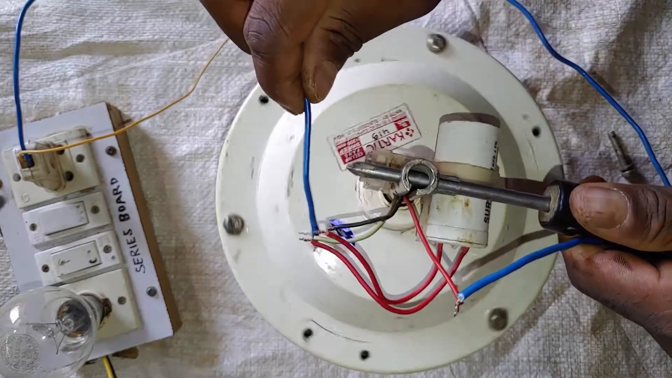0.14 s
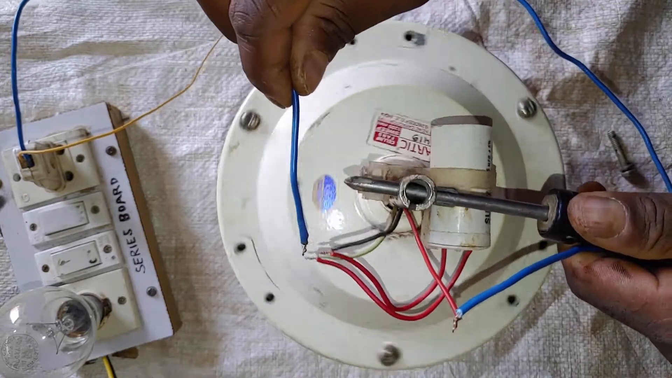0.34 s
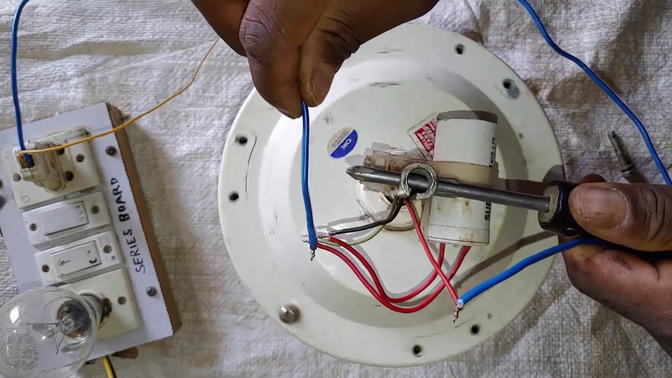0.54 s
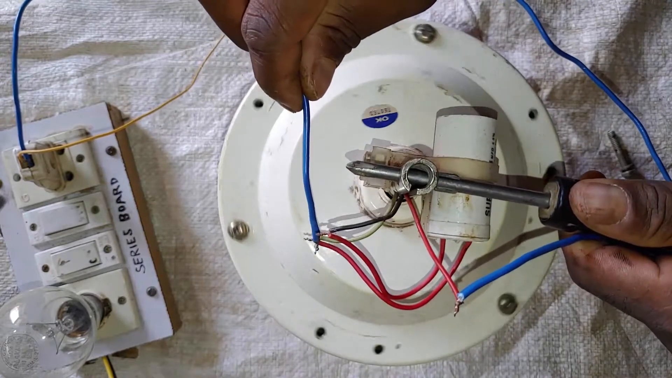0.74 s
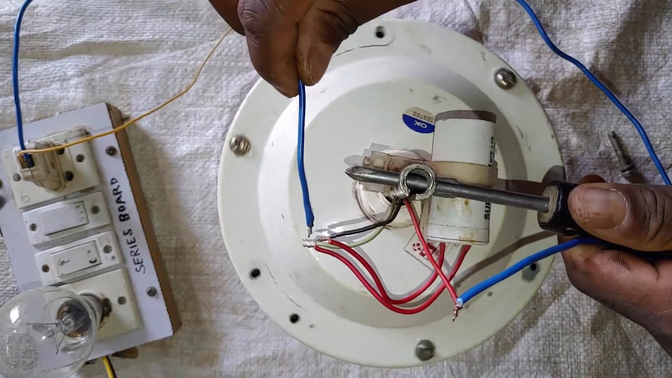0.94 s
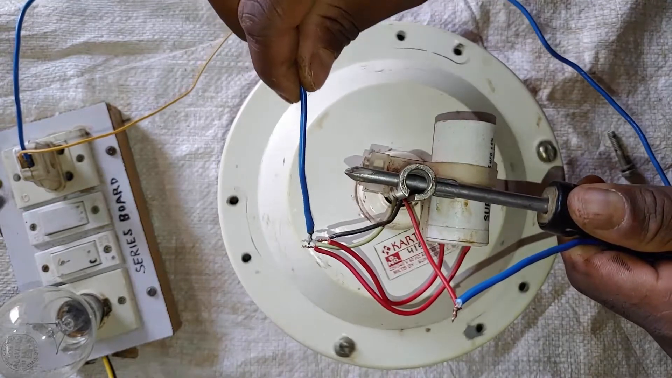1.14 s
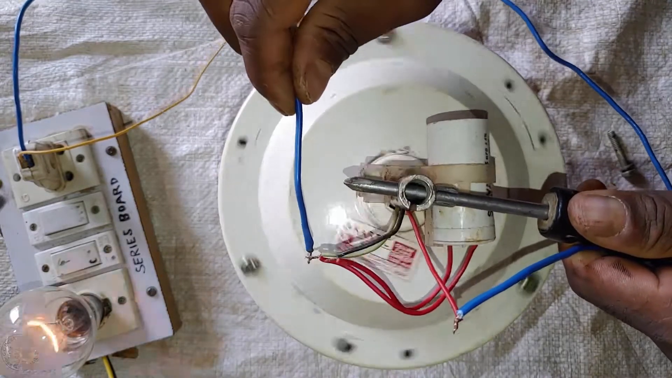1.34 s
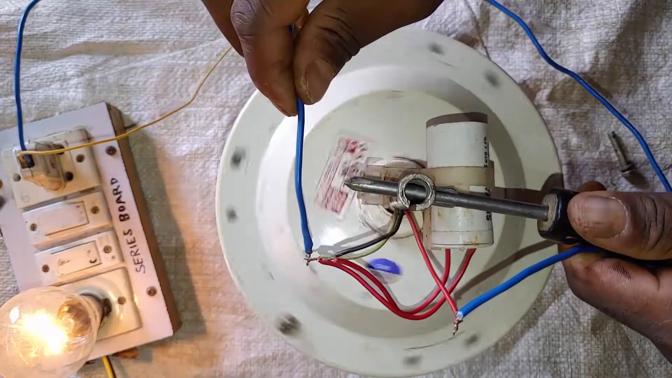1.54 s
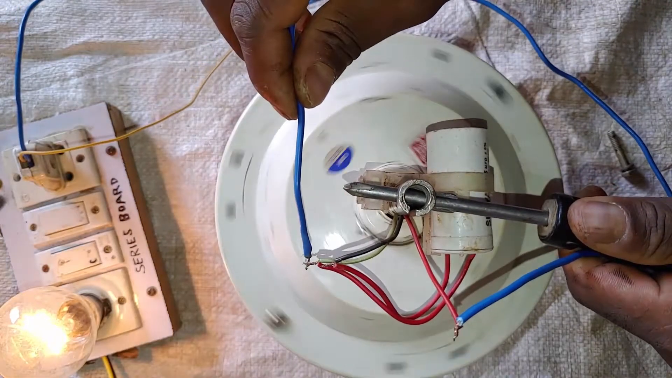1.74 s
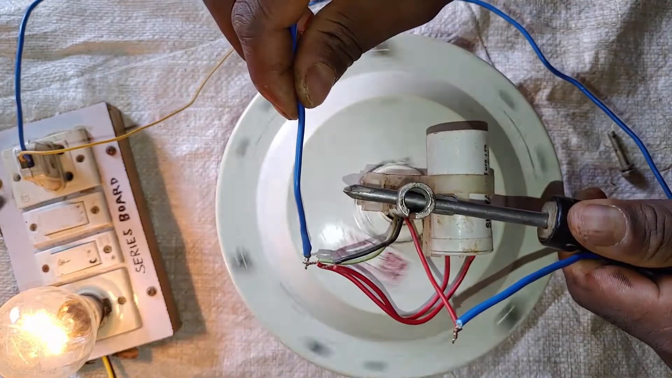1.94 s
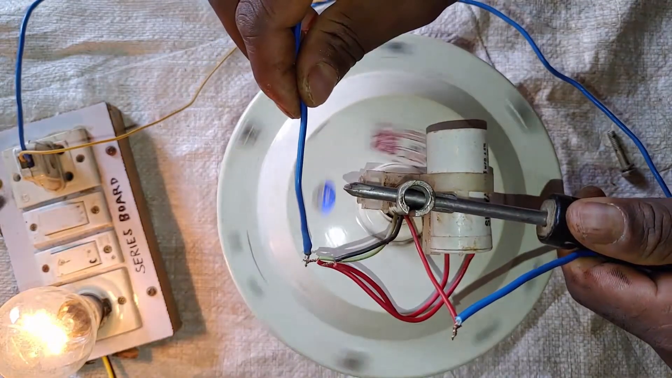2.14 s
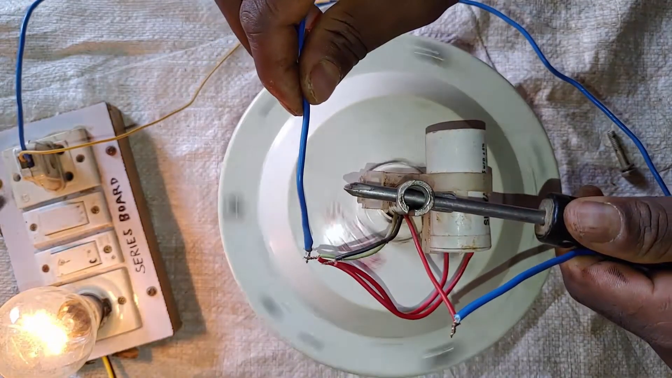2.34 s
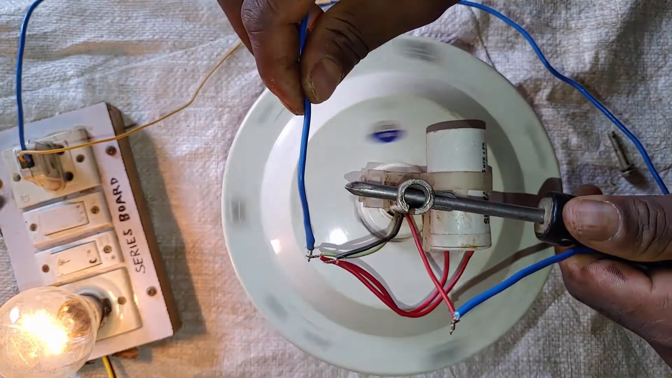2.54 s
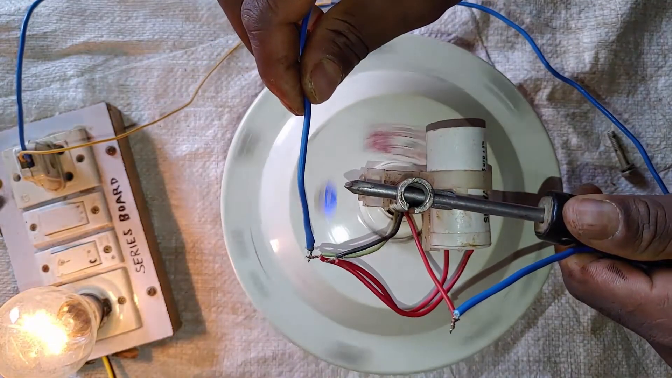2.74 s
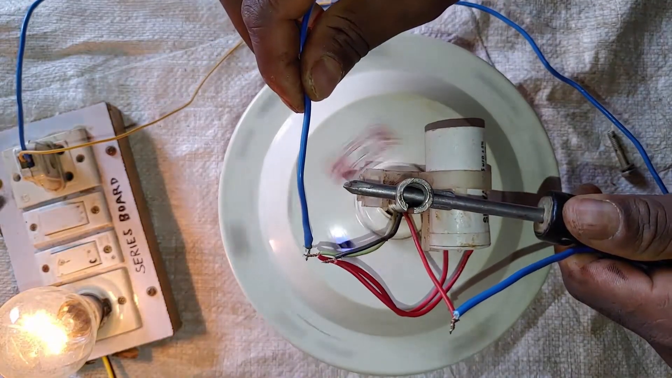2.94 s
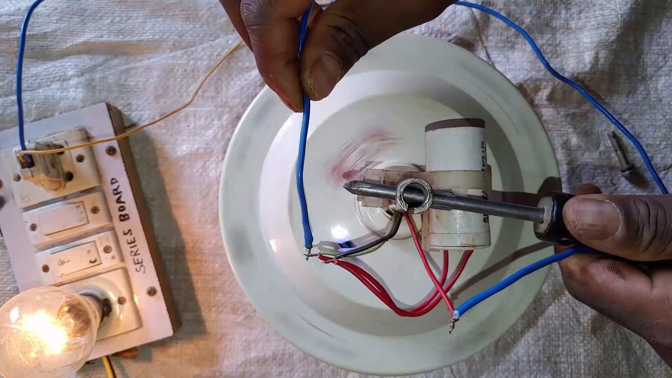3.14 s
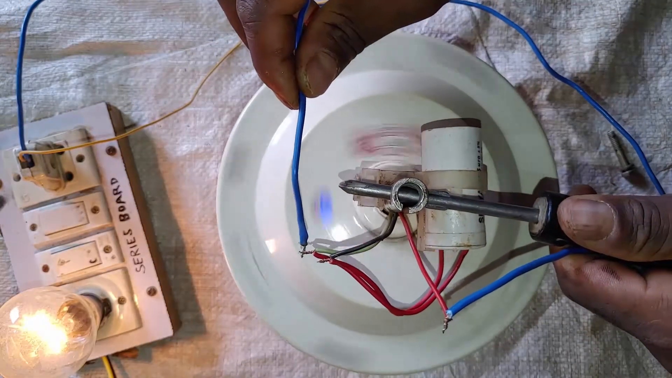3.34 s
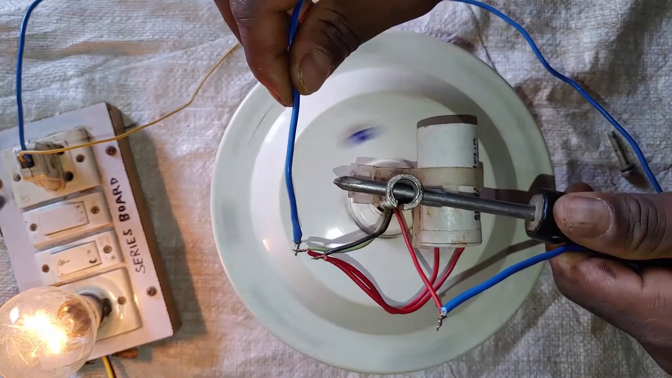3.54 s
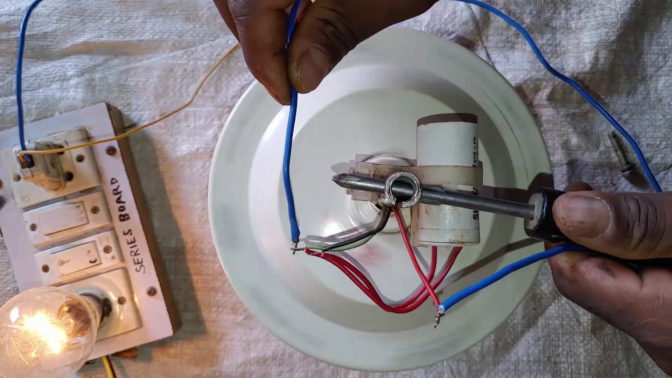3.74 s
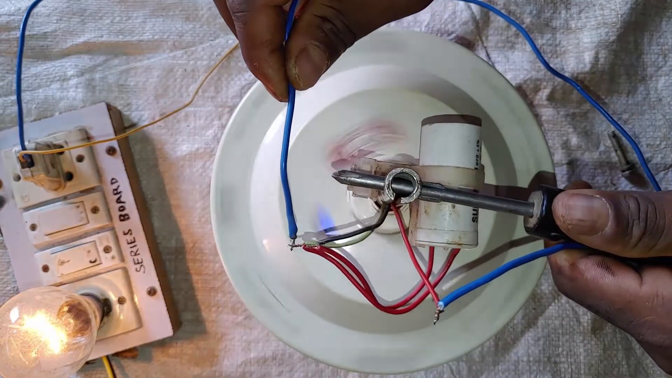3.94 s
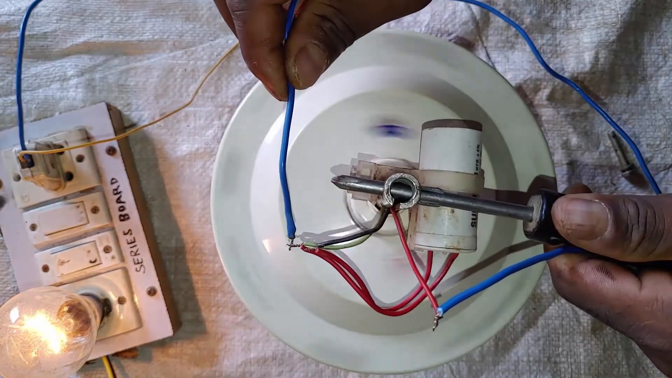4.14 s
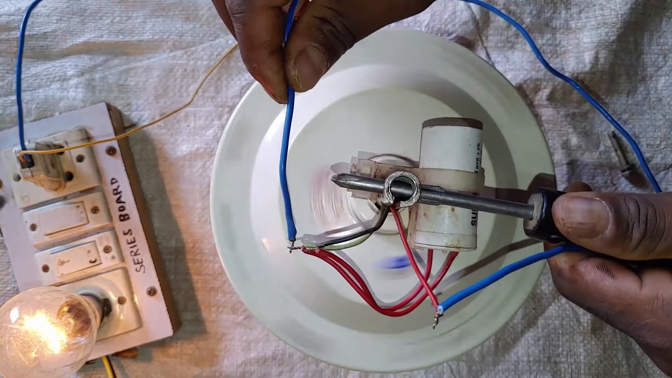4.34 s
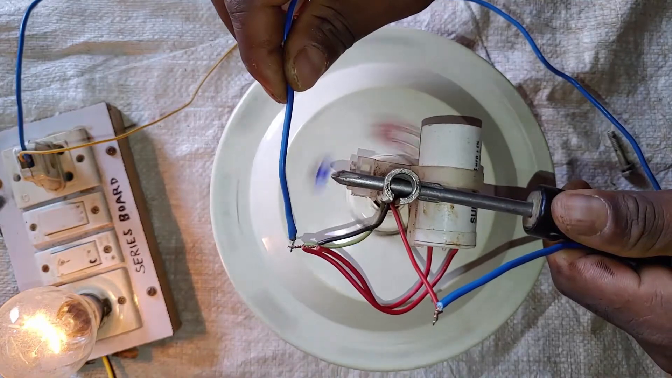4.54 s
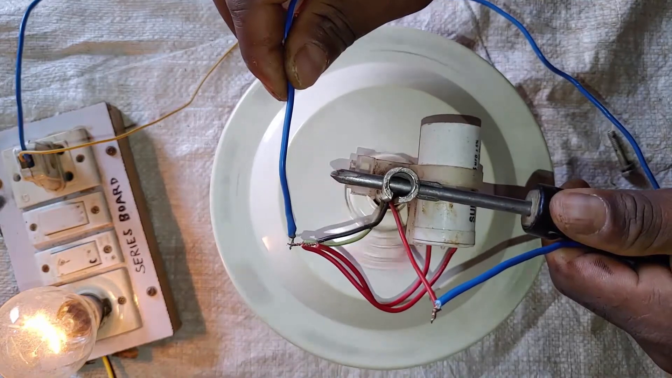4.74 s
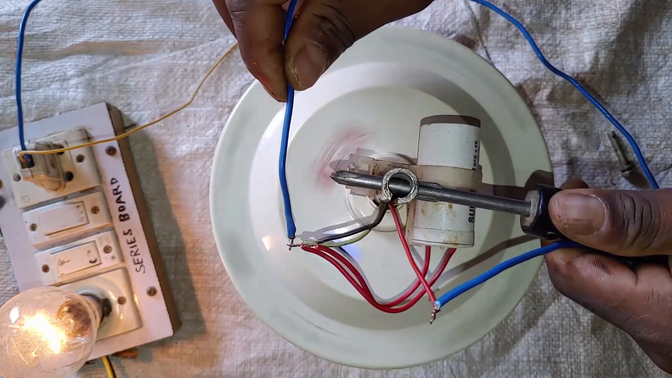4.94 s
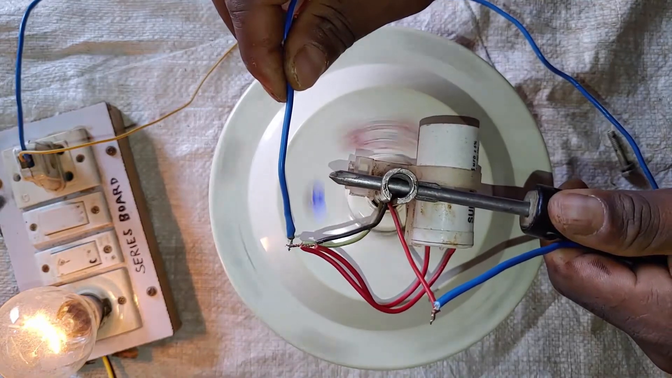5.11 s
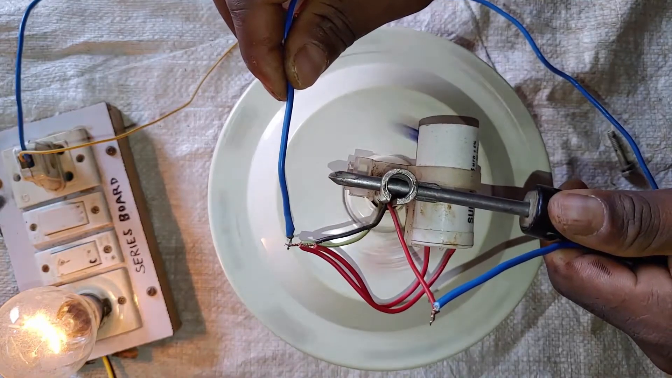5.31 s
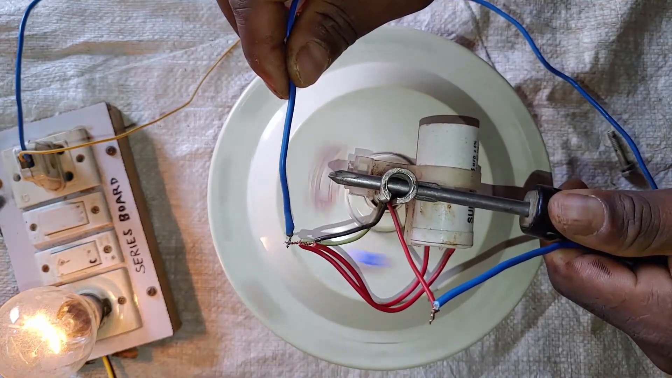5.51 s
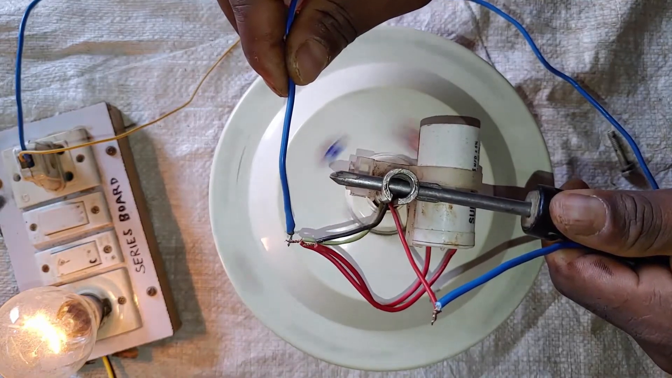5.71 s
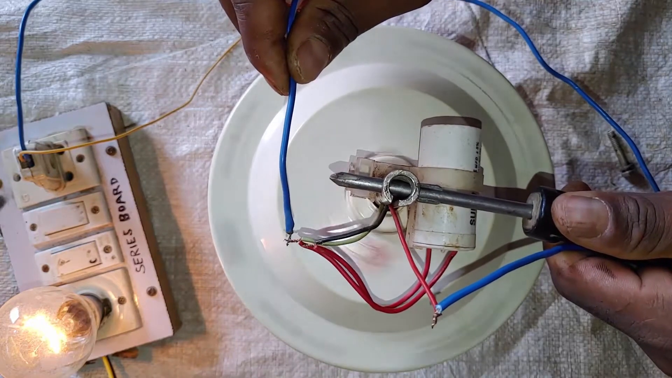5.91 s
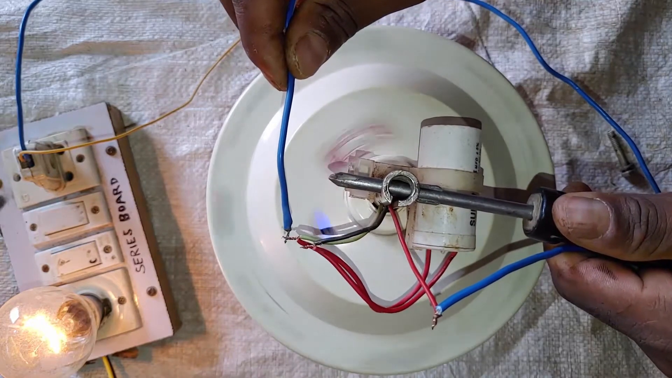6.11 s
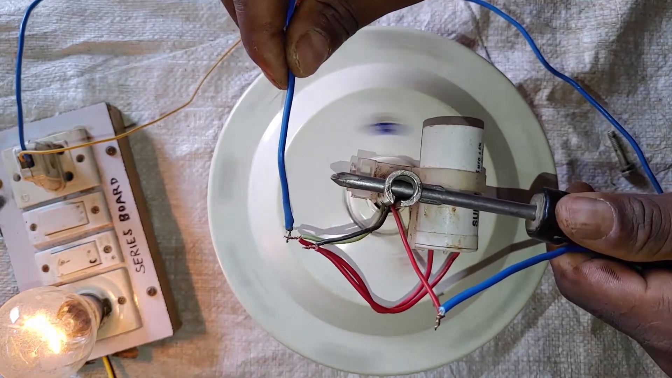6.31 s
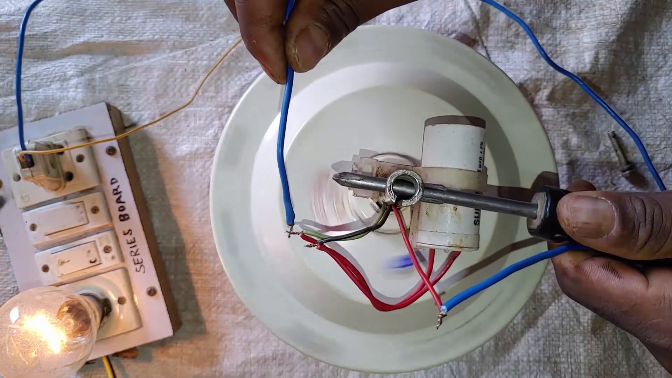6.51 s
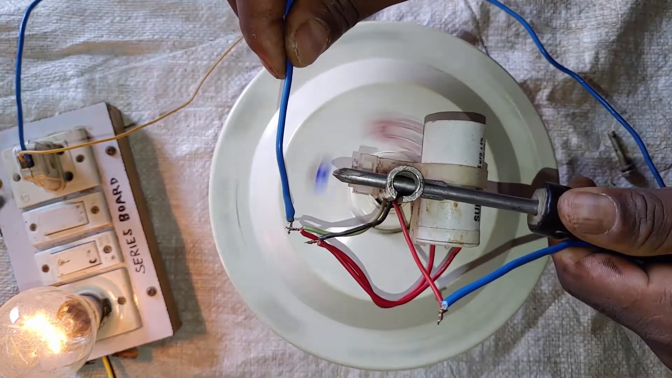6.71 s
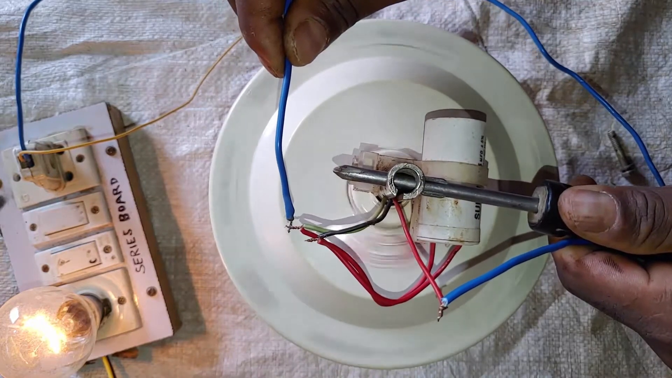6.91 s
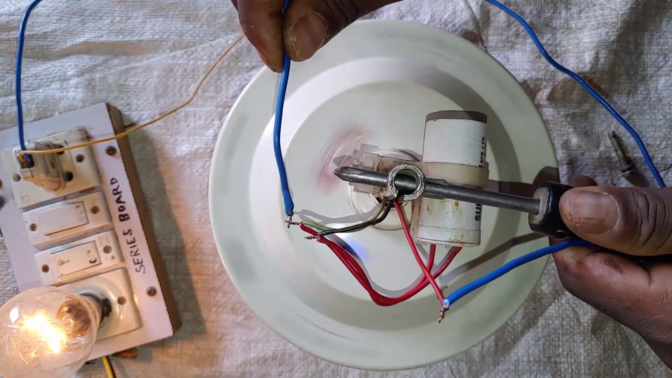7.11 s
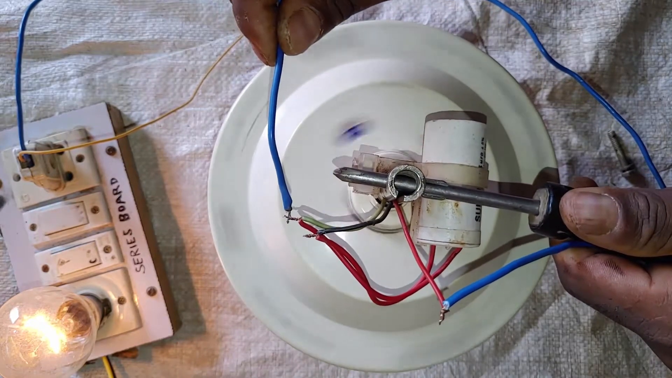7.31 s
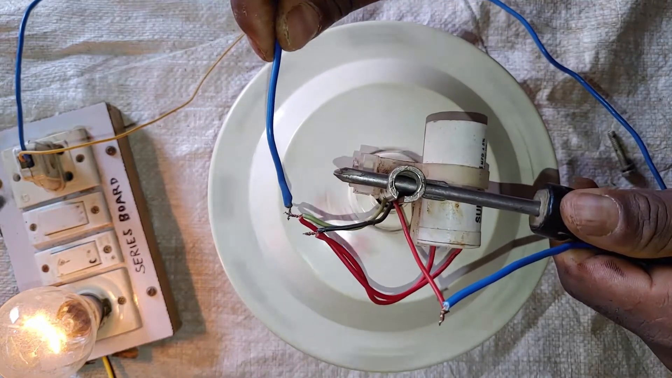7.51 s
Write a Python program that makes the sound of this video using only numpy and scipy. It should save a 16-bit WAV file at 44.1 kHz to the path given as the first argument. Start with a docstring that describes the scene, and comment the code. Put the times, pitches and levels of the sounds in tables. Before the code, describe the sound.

Close indoors, wires tap a steel motor casing with sharp clicks and short metallic clinks, over a faint low hum and thin bird chirps. After about a second the motor is switched on; a faint shudder and slow hollow knocks follow, gathering into a loud dry bearing rattle that pulses rapidly and stays steady to the end. A phone listens from above, its noise suppression keeping the start quiet.

```python
"""Birds chirp over a low wavering hum while wires tap a ceiling fan motor lying on a cloth: contacts excite casing modes.
Switched on at 1.27 s, the casing shudders; the rotor gathers speed, with single knocks while it is still slow.
Its slots whine faintly as their tone crosses a resonance; two worn ball bearings knock and rattle the steel casing,
swelling once a turn, up to about seven turns a second; the upper edge of the treble is heard late.
A phone with two microphones listens from above, suppressing noise and rounding peaks."""
import sys
import numpy as np
from scipy import signal
from scipy.fft import rfft, irfft
from scipy.io import wavfile
from scipy.ndimage import uniform_filter1d

SR = 44100
rng = np.random.default_rng(int(sys.argv[2]) if len(sys.argv) > 2 else 0)


def put_to_file(sound):
    """Save the sound as 16-bit audio at rate SR, in the file named by the first command-line argument."""
    columns = np.atleast_2d(sound).T  # one column per channel
    safe = np.clip(columns, -1, 1)
    whole_steps = np.round(safe * 32767)
    wavfile.write(sys.argv[1], SR, whole_steps.astype(np.int16))


def gain_from_db(level_db):
    """Turn a decibel level (scalar or array-like) into a linear amplitude factor."""
    decades = np.asarray(level_db, float) / 20
    return 10 ** decades


N = 333396
T = np.arange(N) / SR
HZ = np.maximum(np.arange(N // 2 + 1) * SR / N, 1)

# background rumble before the side balance: (frequency [Hz], density [dB per Hz])
RUMBLE = [(20, -83.5), (40, -91.5), (70, -91.5), (120, -116), (170, -99), (240, -102), (330, -106),
          (450, -108), (3000, -108), (9000, -114), (16000, -125)]
# wavering hum before the side balance: (frequency [Hz], width of one resonance [Hz], level [dB])
HUM_BANDS = [(88.6, 6.7, -68.5)]
# faint low tones that fade in and out, before the side balance:
# (middle [s], half length [s], frequency [Hz], level [dB])
DRONE_TONES = [(.2, 0.11, 277.6, -64), (.65, 0.18, 200, -83), (1.35, .35, 279, -73)]
# successive notes of the high trill, before the side balance: (level [dB])
TRILL_NOTES = [-58, -59, -56, -64]
# short falling tones before the side balance, bird whistles and, above 9 kHz, the bright tick of a slow knock:
# (time [s], first pitch [Hz], length [s], level [dB])
FALLING_TONES = [(0.141, 4790, 0.082, -61), (.285, 5950, 0.074, -64.5), (0.382, 5220, 0.041, -65),
                 (0.898, 6860, 0.021, -61), (1.033, 5560, 0.031, -66), (1.066, 5520, 0.028, -69),
                 (1.185, 5500, 0.018, -65), (1.2, 5190, .026, -58.5), (1.375, 5990, 0.077, -62),
                 (1.431, 5920, 0.11, -71), (1.873, 9520, 0.024, -61), (2.216, 6200, 0.037, -65)]
# taps of wire and tool on the casing:
# (time [s], ring level [dB], ring pitch [Hz], clink level [dB], clink pitch [Hz], crack level [dB])
CASING_TAPS = [(.001, -29.5, 1410, -39, 4500, -42), (.008, -41, 1100, -47, 3900, -36),
               (0.114, -36.5, 1400, -40, 4200, -68), (0.2517, -63, 1160, -55, 4700, -25.5),
               (.262, -47.5, 1074, -40, 4500, -34), (0.401, -62, 1400, -45.5, 3960, -79),
               (.913, -25.5, 1272, -26, 3330, -18), (1.226, -29, 1080, -31.5, 3960, -38),
               (1.262, -38, 1250, -54, 4650, -43), (1.2674, -32.5, 1560, -30.5, 2820, -29),
               (1.289, -38, 1400, -47, 2460, -70), (1.431, -47, 1040, -75, 2500, -83)]
# modes that a tap rings: (frequency [Hz], relative level [dB], t60 [s])
TAPPED_MODES = [(1026, -12.5, 0.046), (1116, -3.5, 0.1), (1410, -2, 0.029), (1560, -21, 0.027),
                (1880, 4.5, 0.029), (2440, -2.5, .04), (2820, -1.5, 0.052), (3730, -8, 0.033),
                (3960, 9.5, 0.014), (4180, -19, 0.0442), (4570, 11, 0.044), (5140, 1, .06)]
# single knocks while the rotor is still slow: (time [s], level [dB])
KNOCKS_AT_LOW_SPEED = [(1.631, -39), (1.7, -39.5), (1.877, -42), (2.071, -33.5), (2.333, -26.5),
                       (2.42, -34), (2.476, -27), (2.516, -24.5)]
# low casing resonances: (frequency [Hz], width [Hz], relative level [dB], swell once a turn [dB])
DRUM_MODES = [(277, 103, -15.5, -1.5), (386.8, 28.8, 3.5, 2), (435, 27, 4.5, 4.5), (495.4, 43.5, 0, 6.5),
              (610.4, 32.4, -1, 4.5), (700, 68, -8, 1.5)]
# middle casing resonances: (frequency [Hz], width [Hz], relative level [dB])
RING_MODES = [(813, 110, -6), (965, 64, -4.5), (1063, 49, -0.5), (1200, 117, -3.5), (1280.7, 23.4, 4.5),
              (1400, 29.8, 1.5), (1682, 252, -10.5)]
# treble casing resonances: (frequency [Hz], width [Hz], relative level [dB])
HISS_MODES = [(1960, 460, -6), (2700, 210, -3), (2886, 193, -1), (3264, 310, -2), (3625, 250, -8),
              (3942, 225, -6), (4500, 113, -6), (4720, 170, -6.5), (5090, 114, -17)]
# spectrum of the highest rattle: (frequency [Hz], relative level [dB])
TOP_SPECTRUM = [(4000, -11.5), (5200, 11.5), (5900, 12), (7800, 5), (9200, 9.5), (10400, 4.5),
                (11600, -33.5), (12600, -15), (13500, -24), (14500, -16), (15500, -25)]
# share of the rattle that each microphone hears on its own: (frequency [Hz], share of power [0-1])
SEPARATE_SHARE = [(100, 0.2), (300, 0.14), (640, 0.11), (1400, 0.48), (3100, 0.51), (6800, 0.96),
                  (15000, 1)]
# balance of the microphones: (frequency [Hz], left over right [dB])
LEFT_OVER_RIGHT = [(60, -5.5), (200, -1.5), (380, -3), (700, .5), (1290, -1.5), (2100, 6), (2650, 0),
                   (3200, -6), (3700, 2), (4700, 2), (8000, .5), (15000, -.5)]
# how far the left microphone leads the right: (frequency [Hz], phase [rad])
LEFT_PHASE_LEAD = [(500, 0), (1500, 0.63), (3100, -2.4), (4700, 2.5), (5200, 2), (7000, 1.5), (8600, 1.5),
                   (9500, 1.56), (16000, -1.5)]
# level under which the phone takes sound for noise: (frequency [Hz], density [dB per Hz])
NOISE_THRESHOLD = [(300, -125), (500, -100), (800, -77.5), (1300, -103), (2200, -85), (3000, -101),
                   (3600, -95), (4700, -106), (9500, -106), (11500, -103), (15000, -103)]

HUM_SINKS_S, HUM_SINKS_DB = 3.6, -2  # the hum is weaker from here on
TRILL_S, TRILL_GAP_S, TRILL_HZ, TRILL_FALL_HZ, TRILL_NOTE_S = .086, .0715, 8300, 620, .015
SAG_HZ_S, TICK_FROM_HZ = 3500, 9000  # rate at which a falling tone sinks; pitch that parts tick from whistles
CONTACT_MS, HALVING_DB = 5.1, 35  # contact is half as long when the crack gains this much on the loudest ring
RING_REACH_HZ, CLINK_REACH_HZ, FAR_SHARE = 170, 700, 0.07  # how far from its pitch a tap still shakes modes
CLINK_FROM_HZ = 2200
ROOM_DB, ROOM_T60_S = -41.5, 0.14
# the rotor starts from rest under steady torque and levels off sharply at full speed
START_S, PULL_TURNS_S2, FULL_TURNS_S, SPEED_KNEE, START_TURNS = 1.3212, 2.8522, 6.9261, 22.7, .279
# balls that pass the worn spot in one turn, and where in that cycle the first one is
LOW_BALLS, LOW_START, TOP_BALLS, TOP_START = 4.395, .09, 3.082, -.2
BALL_SWELL_DB, RING_SWELL_DB, DRUM_LAG_TURNS, RING_LAG_TURNS = 1.6, 1.1, .05, .12
LOOSE_SPREAD_DB, BLOW_DB = 1.5, 14.5  # scatter of the loose rattle, gain of the ball-pass blows
FLUTTER_PER_S, BALL_SLIP = 11, .012  # treble flutter; spread of the slip in ball-pass cycles
UNEVENNESS_DB = 1.3  # spread of the random unevenness of the treble spectrum
# bearing noise grows with speed: (level when grown [dB], growth [dB per tenfold speed], end of growth [turns/s])
DRUMMING, RINGING, HISSING, TOP_HISSING = (-27, 43.3, 4.5), (-27, 41.8, 5.28), (-35, 46, 4.12), (-49.5, 88, 5.25)
# a high band above 10.9 kHz is heard late: a steep fade-in written with the same three columns (level when
# grown [dB], growth [dB per tenfold speed], end of growth [turns/s])
LATE_EDGE, EDGE_FROM_HZ = (-57, 220, 6.6), 10900
SWITCH_S, SHUDDER_DB, SHUDDER_T60_S = 1.27, -52.5, 0.77
SLOTS, WHINE_DB, WHINE_HZ, WHINE_WIDTH_HZ = 56, -38, 290, 33
CLIP_AT, TOP_HZ = .45, 15950  # amplitude toward which the phone rounds peaks; end of its band


def rms1(x):
    """Normalisation: scale to unit rms."""
    return x / np.sqrt(np.mean(x ** 2))


def over_hz(table):
    """Logarithmic frequency axis: join (Hz, value) points."""
    hz, value = np.transpose(table)
    return np.interp(np.log(HZ), np.log(hz), value)


def shape(x, response):
    """Linear filtering: multiply the spectrum by a frequency response."""
    return irfft(rfft(x) * response, N)


def peak(hz, width):
    """Damped resonance: a response with gain 1 at its centre."""
    return 1j * HZ * width / (hz ** 2 - HZ ** 2 + 1j * HZ * width)


def body(table):
    """Modal superposition: resonances side by side, neighbours swinging in opposite sense."""
    return sum((-1) ** k * gain_from_db(row[2]) * peak(row[0], row[1]) for k, row in enumerate(table))


def walk(rate):
    """Band-limited chance: smoothed noise of unit spread and no long drift."""
    size = int(SR / rate)
    x = uniform_filter1d(uniform_filter1d(rng.standard_normal(N), size), size)
    return rms1(x - uniform_filter1d(x, size=4 * size))


def level_off(ratio, knee):
    """Saturation: follows the ratio while it is small and stops at 1."""
    return ratio / (1 + ratio ** knee) ** (1 / knee)


def throb(cycles, depth_db):
    """Periodic modulation: a swell that peaks at each whole cycle."""
    return gain_from_db(depth_db * np.cos(2 * np.pi * cycles))


def pair(mono):
    """Two-point reception: each microphone hears the same source with its own colour and phase."""
    tilt = gain_from_db(over_hz(LEFT_OVER_RIGHT) / 2) * np.exp(.5j * over_hz(LEFT_PHASE_LEAD))
    return np.array([shape(mono, tilt), shape(mono, 1 / tilt)])


def floor():
    """Stationary background: filtered noise and a wavering tone, with drones; stronger on the right."""
    rumble = shape(rng.standard_normal((2, N)), gain_from_db(over_hz(RUMBLE)) * np.sqrt(SR / 2))
    hum = 0
    for hz, width, db in HUM_BANDS:
        hum = hum + gain_from_db(db) * rms1(shape(rng.standard_normal((2, N)), peak(hz, width) ** 2))
    level = gain_from_db(-64.5 + 0.87 * walk(6))
    phase = 2 * np.pi * np.cumsum(87 + 1.2 * walk(9.0)) / SR
    steady = level * np.sin(phase + np.array([[0], [1.6]]))
    drone = 0
    for middle, half, hz, db in DRONE_TONES:
        fade = np.exp(-((T - middle) / half) ** 2)
        drone = drone + gain_from_db(db) * fade * rms1(shape(rng.standard_normal(N), peak(hz, 12) ** 2))
    sinking = gain_from_db(HUM_SINKS_DB * np.clip((T - HUM_SINKS_S) / .3, 0, 1))
    return (rumble + (hum + steady) * sinking + drone) * gain_from_db(np.array([[-4], [3]]))


def falling_tones(notes):
    """Frequency glides: rough falling tones, quick to start, smeared by a diffuse decay."""
    out = np.zeros(N)
    for at, hz, fall_hz, length, db in notes:
        x = np.clip((T - at) / length, 0, 1)
        envelope = np.sin(np.pi * x ** .45)
        out += gain_from_db(db) * envelope * np.sin(2 * np.pi * np.cumsum(hz - fall_hz * x) / SR)
    out *= 1 + 0.74 * walk(900)  # roughness
    smear = rng.standard_normal((2, N)) * gain_from_db(-60 * T / 0.54)
    return out * np.array([[1.2], [.8]]) + gain_from_db(-32.5) * shape(out, rfft(smear))


def birds():
    """Gliding oscillation: a trill and whistles from outside, smeared by the way in."""
    trill = [(TRILL_S + k * TRILL_GAP_S, TRILL_HZ, TRILL_FALL_HZ, TRILL_NOTE_S, db)
             for k, db in enumerate(TRILL_NOTES)]
    whistles = [(at, hz, SAG_HZ_S * length, length, db)
                for at, hz, length, db in FALLING_TONES if hz < TICK_FROM_HZ]
    return falling_tones(trill + whistles)


def taps():
    """Impact excitation: a scratchy contact cracks and shakes the modes near its pitch; the room answers."""
    out, t = np.zeros(N + 8192), np.arange(8192) / SR
    hz = np.arange(4097) * SR / 8192
    bright = signal.butter(2, [4500, 12500], "bandpass", fs=SR, output="sos")
    middle = signal.butter(3, [900, 4500], "bandpass", fs=SR, output="sos")
    for at, ring_db, ring_hz, clink_db, clink_hz, crack_db in CASING_TAPS:
        noise = rng.standard_normal((2, len(t)))
        ring_over_crack = max(ring_db, clink_db) - crack_db
        contact_ms = np.clip(CONTACT_MS * 2 ** (ring_over_crack / HALVING_DB), 1, 11)
        x = t / contact_ms * 1000
        burst = noise[0] * (np.exp(-x ** 2) + gain_from_db(-24.5) * np.exp(-t / .02))
        snap = signal.sosfilt(bright, burst) + gain_from_db(-6.5) * signal.sosfilt(middle, burst)
        scrape = rfft(noise[1] * x * np.exp(-x ** 2))
        parts = np.zeros((2, len(hz)), complex)  # ring below, clink above
        for mode_hz, db, t60 in TAPPED_MODES:
            high = int(mode_hz > CLINK_FROM_HZ)
            off = (mode_hz - (ring_hz, clink_hz)[high]) / (RING_REACH_HZ, CLINK_REACH_HZ)[high]
            strength = (np.exp(-off ** 2) + FAR_SHARE) * gain_from_db(db)
            parts[high] += strength / (np.log(1000) / t60 + 2j * np.pi * (hz - mode_hz))
        rings = irfft(scrape * parts * hz ** 6 / (hz ** 6 + 850 ** 6))
        rings /= np.abs(rings).max(axis=1, keepdims=True)
        start = int(at * SR)
        out[start:start + len(t)] += gain_from_db(crack_db) * snap + gain_from_db(np.array([ring_db, clink_db])) @ rings
    room = rng.standard_normal((2, N)) * gain_from_db(ROOM_DB - 60 * T / ROOM_T60_S)
    return pair(out[:N]) * gain_from_db(np.array([[-1], [1]])) + shape(out[:N], rfft(room))


def slow_knocks():
    """Impulse response: single blows set the low casing modes thudding, one with a bright tick."""
    blows = np.zeros(N)
    for at, db in KNOCKS_AT_LOW_SPEED:
        blows[int(at * SR)] = gain_from_db(db)
    thud = body(DRUM_MODES) * peak(447, 120) + gain_from_db(-22) * body(RING_MODES)
    thuds = pair(shape(blows, thud) / np.max(np.abs(irfft(thud, N))))
    ticks = [(at, hz, SAG_HZ_S * length, length, db)
             for at, hz, length, db in FALLING_TONES if hz >= TICK_FROM_HZ]
    return thuds + falling_tones(ticks)


def slot_whine(speed, turns):
    """Slot-passing tone: it shows while its frequency crosses a casing resonance."""
    resonance = np.exp(-((SLOTS * speed - WHINE_HZ) / WHINE_WIDTH_HZ) ** 2)
    return gain_from_db(WHINE_DB) * resonance * np.sin(2 * np.pi * SLOTS * turns)


def switch_shudder(drum, ring, fine):
    """Exponential decay: the casing shudders briefly when the current comes on."""
    decay = (T > SWITCH_S) * gain_from_db(SHUDDER_DB - 60 * (T - SWITCH_S) / SHUDDER_T60_S)
    broad = rms1(irfft(fine * peak(2300, 4500), N))
    return decay * (gain_from_db(-5.5) * rms1(ring) + gain_from_db(-11.5) * rms1(drum) + broad)


def rattle(per_s, spread_db):
    """Random impacts: spectra of loose balls striking, partly shared by both microphones, partly separate."""
    hit = rng.random((3, N)) < per_s / SR
    hardness = np.minimum(rng.exponential(size=(3, N)), 2.0)  # most soft, a few hard
    both, left, right = hit * rng.standard_normal((3, N)) * gain_from_db(spread_db * hardness)
    apart = np.clip(over_hz(SEPARATE_SHARE), 0, 1)
    return rfft(pair(both)) * np.sqrt(1 - apart) + rfft(np.array([left, right])) * np.sqrt(apart)


def knocks(cycles, scatter_db, slip):
    """Ball-pass impacts: spectra of one blow a pass, a little early or late as the balls slide."""
    at = np.flatnonzero(np.diff(np.floor(cycles + slip * walk(12))) > 0)
    blows = np.zeros(N)
    blows[at] = gain_from_db(scatter_db * np.clip(rng.standard_normal(N)[at], -2, 1))
    return rfft(pair(blows))


def bearing_drum(turns, low_pass):
    """Forced resonance: rattle and ball-pass blows shake each low mode, modulated once a turn."""
    loose, blows = rattle(1500, LOOSE_SPREAD_DB), knocks(low_pass + .2, 1.15, BALL_SLIP)
    drum = 0
    for k, (hz, width, db, swell_db) in enumerate(DRUM_MODES):
        mode = (-1) ** k * gain_from_db(db) * peak(hz, width)
        shake = irfft(loose * mode, N) * throb(low_pass, BALL_SWELL_DB) + gain_from_db(BLOW_DB) * irfft(blows * mode, N)
        drum = drum + shake * throb(turns - DRUM_LAG_TURNS, swell_db)
    return drum


def bearing_ring(turns):
    """Modal ringing: rattle excites the middle casing modes and swells once a turn."""
    ring = irfft(rattle(4000, 1.9) * body(RING_MODES), N)
    return ring * throb(turns - RING_LAG_TURNS, RING_SWELL_DB) * gain_from_db(0.78 * walk(8.9))


def treble_layers(turns, top_pass, fine):
    """Modulated noise: hiss and top hiss throb with ball passes and share one flutter; a high band above 10.9
    kHz, heard late, swells and flutters along with them."""
    flutter = throb(turns + 0.1, 0.76) * gain_from_db(0.74 * walk(FLUTTER_PER_S))
    hiss = irfft(fine * body(HISS_MODES), N) * throb(top_pass, 1.7) * flutter
    high = fine * gain_from_db(over_hz(TOP_SPECTRUM))
    above = HZ > EDGE_FROM_HZ
    swell = throb(top_pass, 0.89) * flutter
    return hiss, irfft(high * ~above, N) * swell, irfft(high * above, N) * swell


def follow_speed(x, law, speed):
    """Power law: unit-rms sound takes a level that follows the speed up to a limit."""
    full_db, db_per_tenfold, end_turns_s = law
    return rms1(x) * gain_from_db(full_db + db_per_tenfold * np.log10(level_off(speed / end_turns_s, knee=17.9)))


def motor():
    """Rotating unbalance: both bearings shake the casing, loaded hardest once a turn by the off-centre rotor."""
    running_s = np.maximum(T - START_S, 1e-3)
    speed = FULL_TURNS_S * level_off(running_s * PULL_TURNS_S2 / FULL_TURNS_S, SPEED_KNEE)
    turns = START_TURNS + np.cumsum(speed) / SR
    low_pass, top_pass = LOW_BALLS * turns + LOW_START, TOP_BALLS * turns + TOP_START
    drum, ring = bearing_drum(turns, low_pass), bearing_ring(turns)
    # random unevenness of the treble spectrum
    uneven = rms1(uniform_filter1d(rng.standard_normal(len(HZ)), size=500))
    fine = rattle(7000, 1.8) * gain_from_db(UNEVENNESS_DB * uneven)
    hiss, top, edge = treble_layers(turns, top_pass, fine)
    low = follow_speed(drum, DRUMMING, speed) + follow_speed(ring, RINGING, speed)
    treble = follow_speed(hiss, HISSING, speed) + follow_speed(top, TOP_HISSING, speed)
    late_edge = follow_speed(edge, LATE_EDGE, speed)
    return low + treble + late_edge + switch_shudder(drum, ring, fine) + slot_whine(speed, turns) + slow_knocks()


def scene():
    """Superposition: the quiet background, birds, taps and motor add."""
    return floor() + birds() + taps() + motor()


def suppress(x):
    """Spectral noise suppression: a frequency is turned down while its level is near the noise guess."""
    hz, _, frames = signal.stft(x, SR, nperseg=512, noverlap=384)
    power = np.mean(np.abs(frames) ** 2, axis=0)
    power = uniform_filter1d(uniform_filter1d(power, size=3, axis=0), size=5, axis=1)
    guess_hz, guess_db = np.transpose(NOISE_THRESHOLD)
    noise = gain_from_db(np.interp(np.log(hz + 1), np.log(guess_hz), guess_db)) ** 2 * SR / 512
    gain = np.maximum((power / (power + noise[:, None])) ** 4.1, gain_from_db(-17.5))
    return signal.istft(frames * gain, SR, nperseg=512, noverlap=384)[1][:, :N]


def roll_off(x):
    """The treble ends steeply here."""
    return signal.sosfilt(signal.butter(12, 16480, fs=SR, output="sos"), x)


def record(dry):
    """Nonlinear reception: the phone suppresses noise, rounds peaks, cuts the top and adds a steady offset."""
    rounded = CLIP_AT * np.tanh(suppress(dry) / CLIP_AT)
    clean = shape(rounded, np.clip((TOP_HZ - HZ) / 300, 0, 1))
    return roll_off(clean - .0025)


dry = scene()
out = record(dry)
put_to_file(out)
```